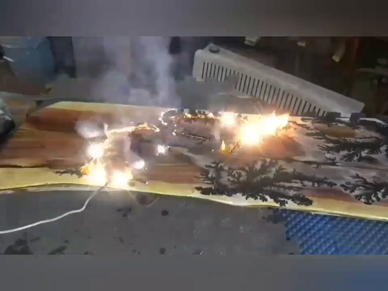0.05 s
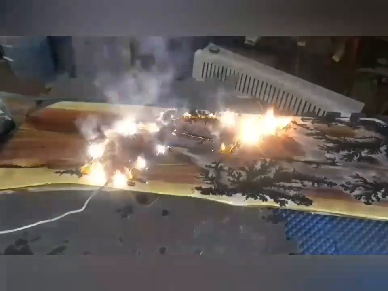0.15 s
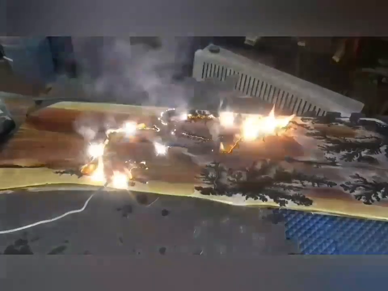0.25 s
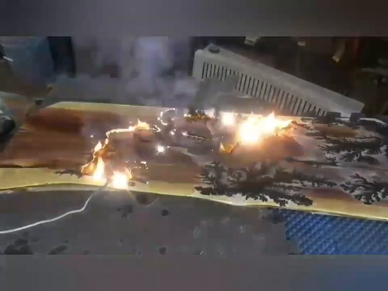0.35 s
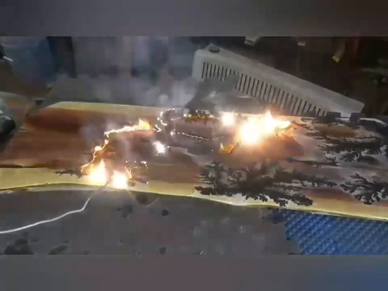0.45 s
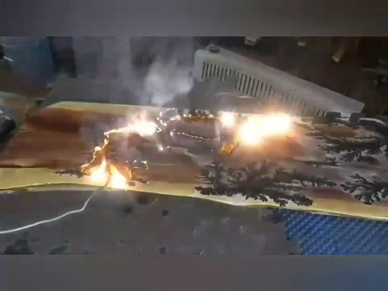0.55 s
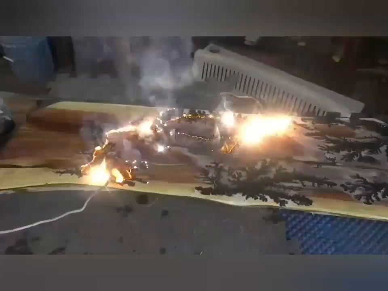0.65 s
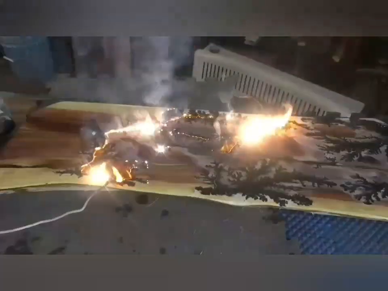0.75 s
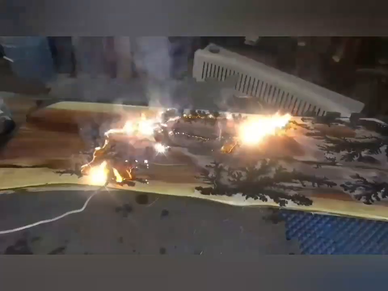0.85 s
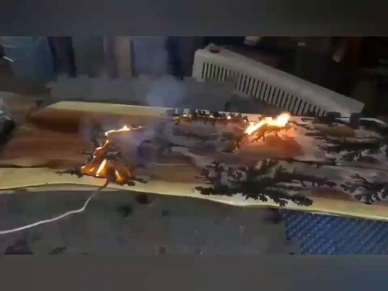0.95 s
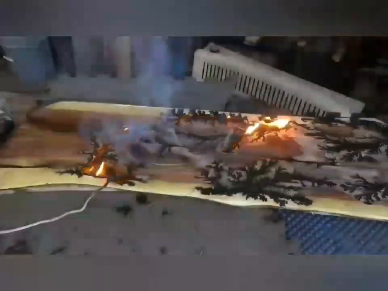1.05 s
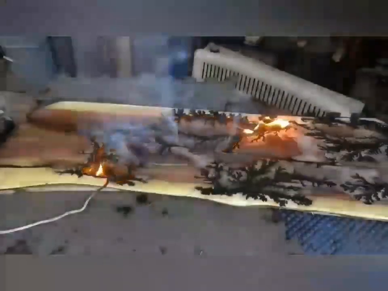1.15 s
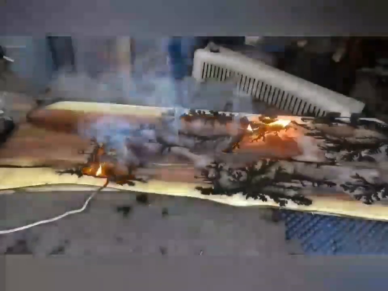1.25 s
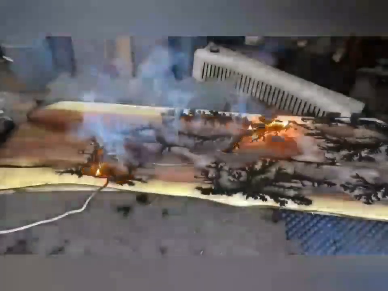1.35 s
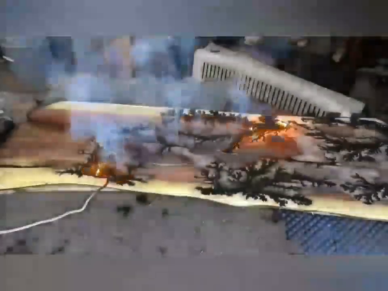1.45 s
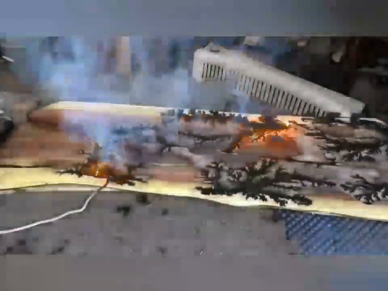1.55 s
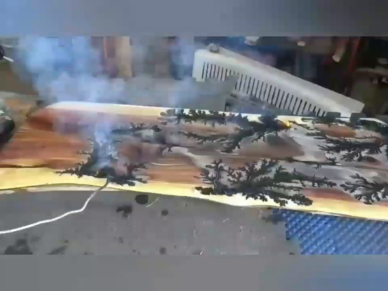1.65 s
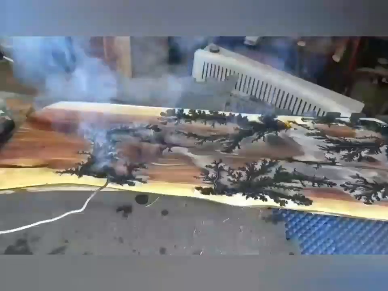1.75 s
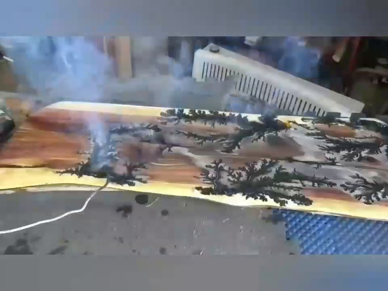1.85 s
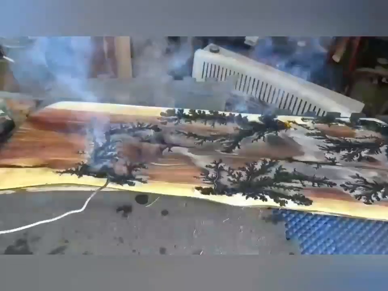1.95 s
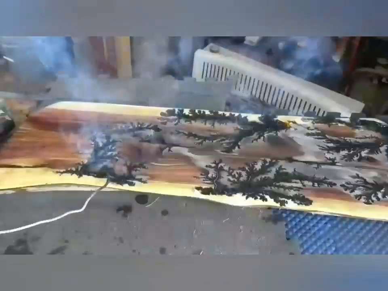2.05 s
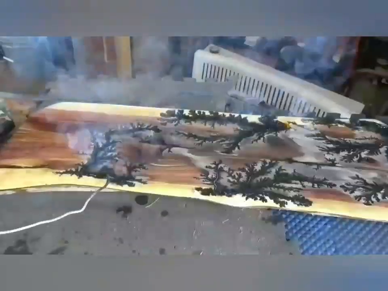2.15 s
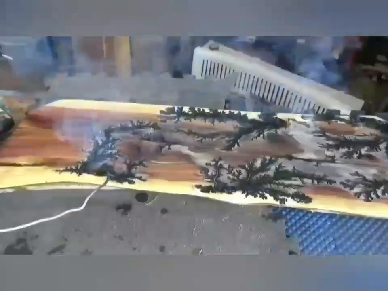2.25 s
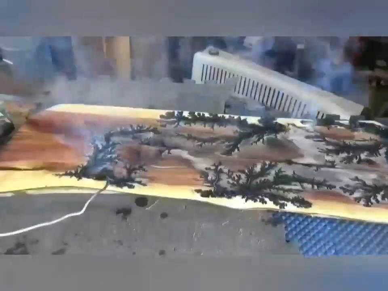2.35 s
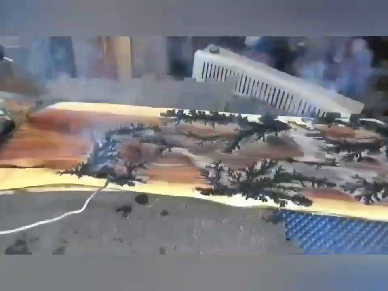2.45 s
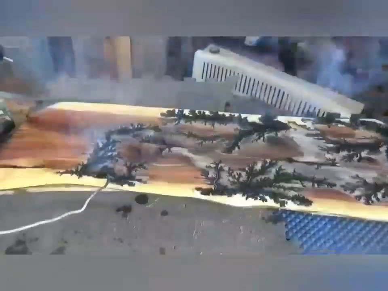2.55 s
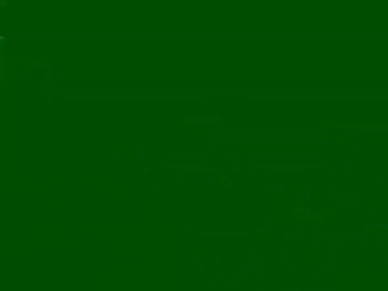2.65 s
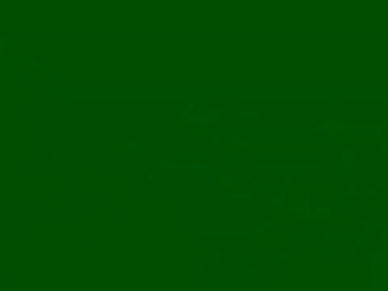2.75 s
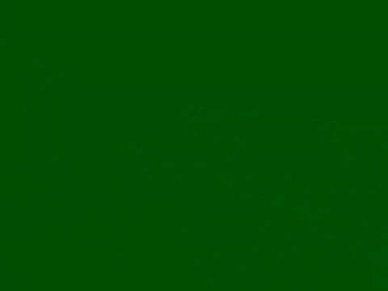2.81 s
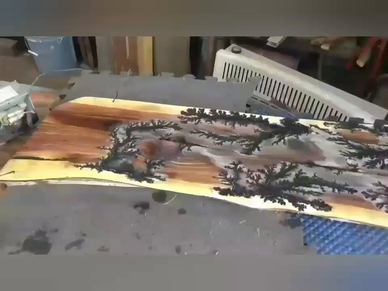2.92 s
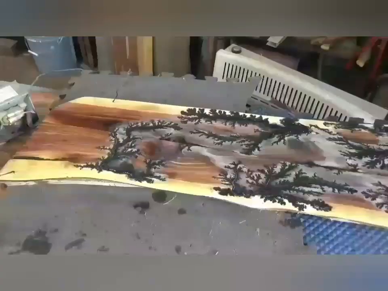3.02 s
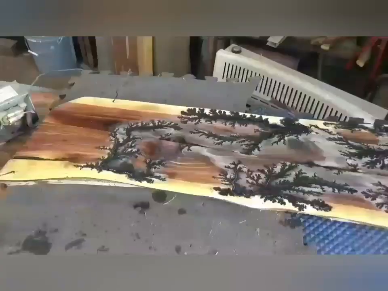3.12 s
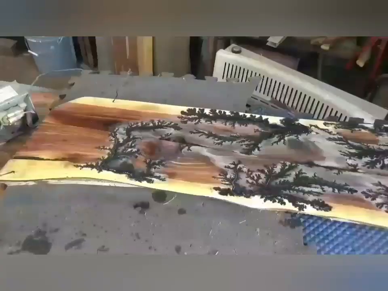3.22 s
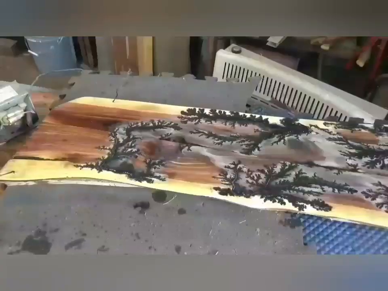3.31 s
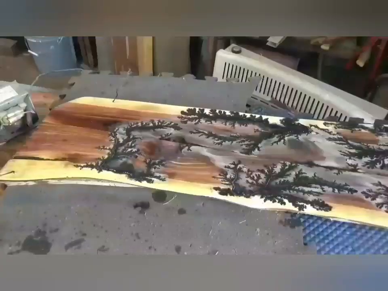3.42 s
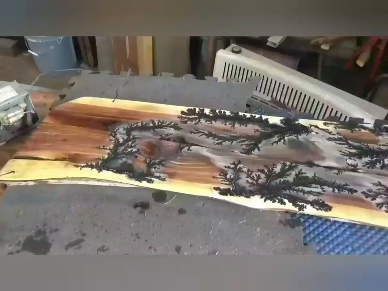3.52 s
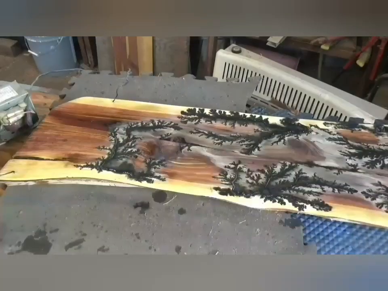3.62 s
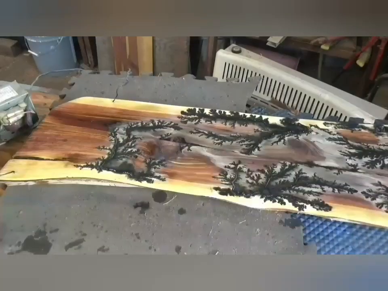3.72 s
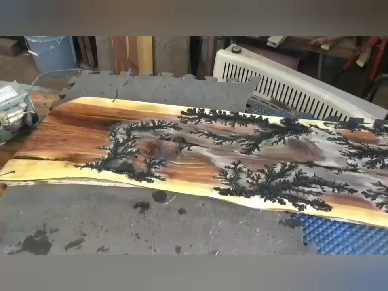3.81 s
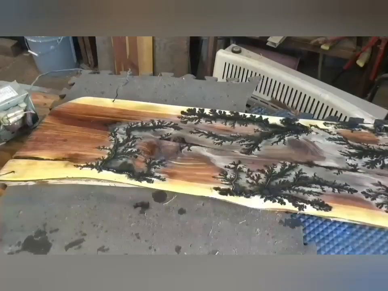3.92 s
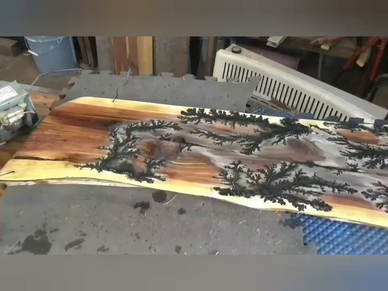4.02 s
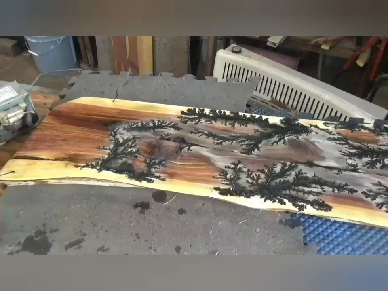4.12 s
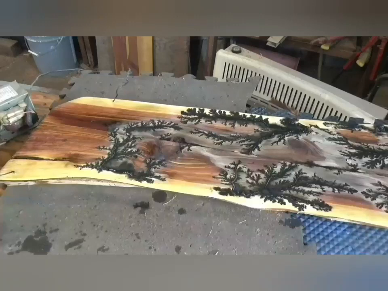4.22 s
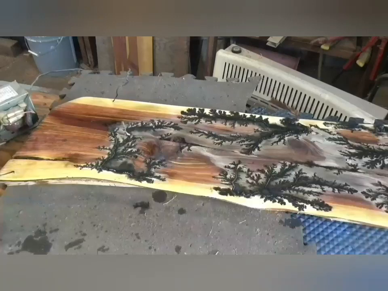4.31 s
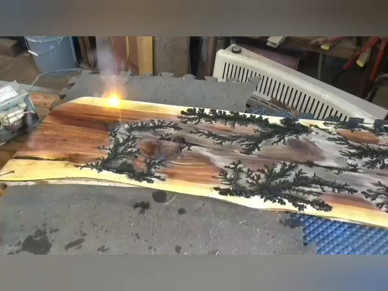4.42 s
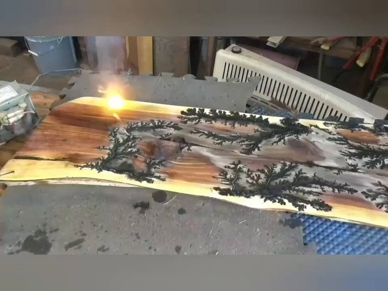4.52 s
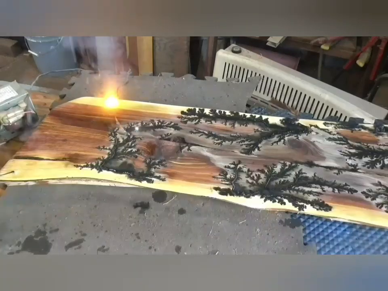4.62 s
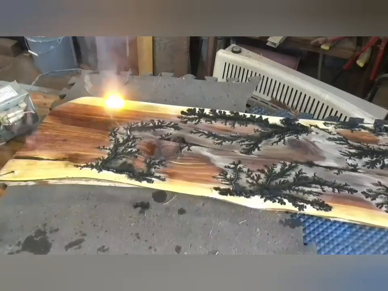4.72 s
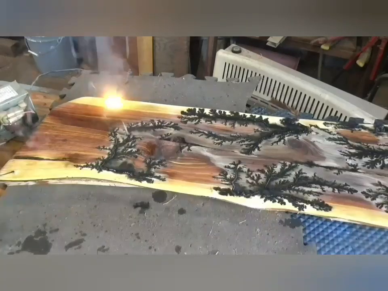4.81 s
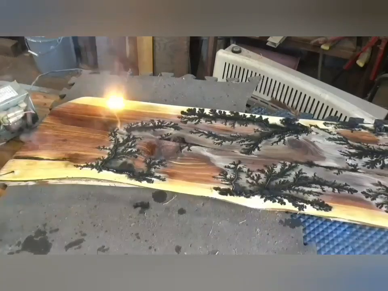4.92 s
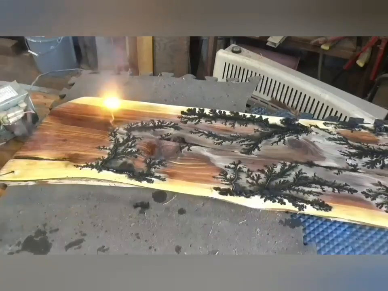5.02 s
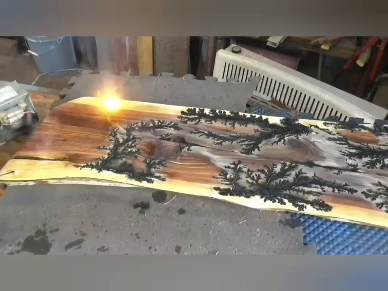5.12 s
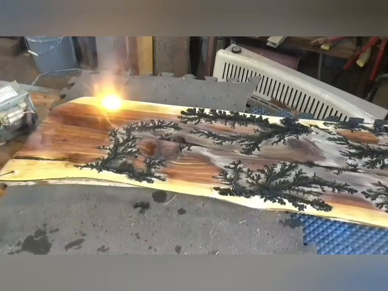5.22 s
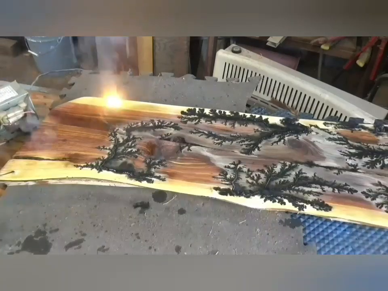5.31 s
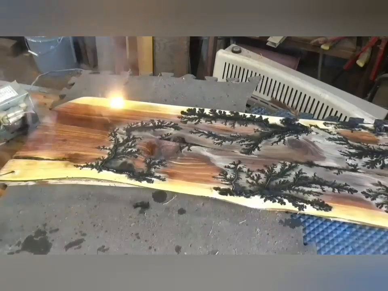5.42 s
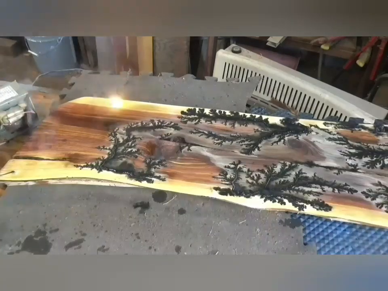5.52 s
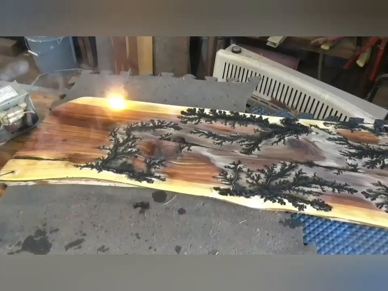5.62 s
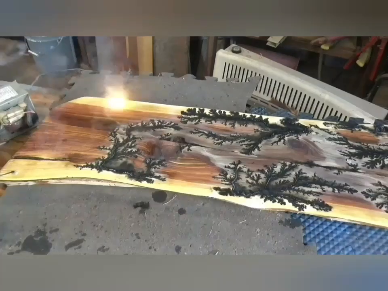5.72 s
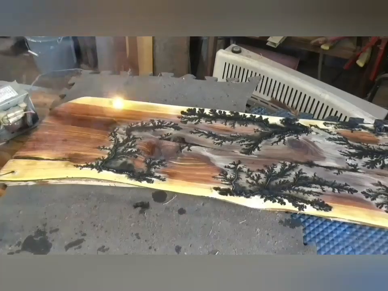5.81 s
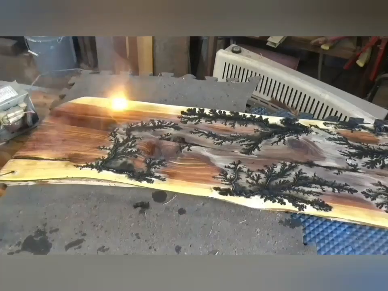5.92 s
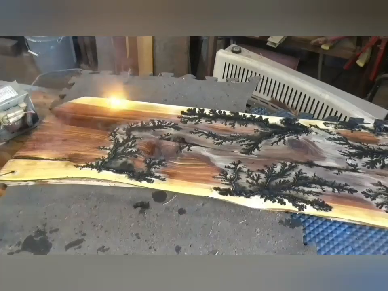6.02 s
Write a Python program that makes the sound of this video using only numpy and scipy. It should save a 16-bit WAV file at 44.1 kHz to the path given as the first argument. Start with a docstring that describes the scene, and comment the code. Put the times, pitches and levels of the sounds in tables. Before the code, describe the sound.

Electric arcs sizzle and hum on damp wood, cut out with a clack, leaving spitting steam, before a loud, rasping, snapping arc strikes.

```python
"""In a workshop, mains-frequency high voltage burns branching tracks into a damp wooden slab.
Small arcs sizzle over a hum: mains-pulsed noise and crackle above even harmonics and a sputtering flame.
The power drops with a clack of ringing modes; hot char fizzes, steams and spits in shaped bursts of noise.
Softer, the switch clacks again, and one fierce arc strikes: noise flashed sixty times a second over a
roaring, buzzing flame, with hard snaps. It blows out briefly, relights and burns on."""
import sys
import numpy as np
from scipy import signal
from scipy.fft import rfft, irfft, next_fast_len
from scipy.io import wavfile
from scipy.ndimage import map_coordinates

SR = 44100
rng = np.random.default_rng(int(sys.argv[2]) if len(sys.argv) > 2 else 0)


def output_pcm(signal):
    """Save a mono or channel-first signal as 16-bit PCM at the path in sys.argv[1].

    Samples are clipped to [-1, 1] before scaling.
    """
    pcm = np.clip(np.atleast_2d(signal).T, -1, 1) * 32767
    wavfile.write(sys.argv[1], SR, np.round(pcm).astype(np.int16))


N = 267246
T = np.arange(N) / SR
MAINS_HZ = 60
POWER_OFF_S = 0.948
TOP_HZ = 16100  # band limit of the output

# Spectrum of the workshop background [f/Hz, relative level/dB per Hz]
AIR_COLOUR = [(15, -39), (25, 7), (166, 12), (560, -8), (677, -28), (1190, -20), (1330, 4), (1610, -26),
              (16000, -9)]
# Room decay time [f/Hz, t60/s]
ROOM_DECAY = [(150, 0.071), (1500, 0.15), (12000, 0.34)]

# Spectrum of the small arcs' sizzle [f/Hz, relative level/dB per Hz]
SIZZLE_COLOUR = [(250, -20), (480, -5), (750, -5), (1050, -9.5), (1800, -7), (2500, -2), (3900, -3),
                 (4500, -7.5), (5400, -5), (6300, 0), (8000, -1.5), (10300, 0), (13000, -6), (16000, -6.5)]
# Stereo width of the sizzle [f/Hz, side minus mid level/dB]
SIZZLE_WIDTH = [(400, -31), (600, -8), (1300, -5.5), (2400, -10), (3400, -40), (4600, -1.5), (8000, -14.5),
                (15000, -8)]
# Harmonics of the hum [multiple of the mains, relative level/dB]
HUM_HARMONICS = [(2, 0.5), (4, -4.5), (6, -8), (8, -13), (10, -21.5), (12, -24)]
# Flames flare up along the tracks, or sink [t/s, hum gain/dB]
FLARES = [(0.032, 0.5), (0.078, 2.5), (0.16, 4.5), (0.245, 2), (0.334, 11), (0.4, 9.5), (0.51, -2),
          (0.63, 5), (0.718, 6.5), (0.78, -5), (0.82, 4), (0.89, 7.5), (0.936, 8.5)]
# Spectrum of the small flames [f/Hz, relative level/dB per Hz]
SPUTTER_COLOUR = [(25, -20), (80, 7), (330, 5.0), (520, -1.5), (750, -9), (1300, -44)]
# Stereo width of the small flames [f/Hz, side minus mid level/dB]
SPUTTER_WIDTH = [(60, -4), (150, -9), (220, -20), (400, -18), (550, -6)]
# Spectrum of the hot gas puffs [f/Hz, relative level/dB per Hz]
DRAUGHT_COLOUR = [(15, -12), (35, -2), (80, 0), (160, -12), (400, -50)]
# Stereo width of the hot gas puffs [f/Hz, side minus mid level/dB]
DRAUGHT_WIDTH = [(30, -1), (150, -5)]

# The switch clacks as the power drops and, softly, as it returns [t/s, blow level/dB]
CLACKS = [(0.946, -25.5), (4.124, -44)]
# Resonances of the switch [f/Hz, width/Hz, relative level/dB]
CLACK_MODES = [(625, 42, 0), (745, 60, -4), (872, 50, 0), (960, 70, -6), (1470, 70, -7), (2520, 300, -17)]
# The char cracks with a bright tick [t/s, blow level/dB]
TICK = (2.184, -41)
# Resonances of the tick [f/Hz, width/Hz, relative level/dB]
TICK_MODES = [(3400, 81, -5), (3650, 160, 0), (4580, 90, -4)]
# One dull knock [t/s, blow level/dB]
KNOCK = (2.312, -44)
# Resonances of the knock [f/Hz, width/Hz, relative level/dB]
KNOCK_MODES = [(172, 30, 0), (262, 40, -11), (900, 900, -25)]

# Stages of the steam between the arcs
# [start t/s, end t/s, hiss level/dB, body level/dB, level change/dB per s]
HISSES = [(0.944, 2.58, -56.5, -55.5, -8), (2.7, 4.04, -56.5, -56, -0.7), (4.134, 4.385, -48.5, -51, 16)]
# Spectrum of the seeping steam [f/Hz, relative level/dB per Hz]
STEAM_COLOUR = [(88, -4.5), (150, -5.5), (514, -8.5), (624, -7.5), (1040, -11.5), (1720, -8), (3700, -7.5),
                (4860, -9.5), (8560, -9.5), (14800, -16.5), (16000, -17)]
# Stereo width of steam and background [f/Hz, side minus mid level/dB]
STEAM_WIDTH = [(60, -27), (150, -26), (380, -8), (950, -3), (2380, -5.5), (5980, -3), (15000, -10)]
# Spectrum of the finest bubbles [f/Hz, relative level/dB per Hz]
FIZZ_COLOUR = [(2000, -38), (7000, 2), (13000, -2), (16000, -6)]
# Spits of steam [t/s, relative level/dB, body against treble/dB, rise/s, fall/s]
SPITS = [(1.206, -28.5, -7, 0.0097, 0.014), (1.25, -32.5, -8.5, .011, 0.031),
         (1.323, -28.5, -8.5, 0.02, 0.017), (1.417, -22, -5.5, 0.0065, 0.013),
         (1.487, -34, -5.5, 0.036, .03), (1.581, -44, -5, .01, .007), (1.72, -40.5, -11, 0.038, 0.031),
         (1.795, -34, -10, .009, .013), (1.903, -35, -10, .004, 0.018), (2.184, -35, -5.5, 0.0077, 0.013),
         (2.313, -54, 7, .002, .008), (2.42, -40.5, -1, 0.0066, 0.019), (2.468, -45.5, -4, 0.016, 0.022),
         (2.811, -35.5, -1.5, .024, 0.006), (2.892, -30, -1.5, .01, 0.022), (2.99, -42.5, -4, .04, 0.041),
         (3.225, -38.5, -0.5, 0.0022, 0.017), (3.3, -33, -5, 0.019, 0.012),
         (3.325, -33, -20, 0.0075, 0.0049), (3.5, -38, -2.5, 0.033, 0.069), (3.694, -27, -5.5, 0.014, .02),
         (3.816, -26, -1, .008, 0.015), (4.06, -42, 2, 0.0044, 0.013), (4.112, -30, -8, 0.0036, 0.0055),
         (4.157, -36.5, 2, 0.008, 0.007)]
# Spectrum of the spits [f/Hz, relative level/dB per Hz]
SPIT_COLOUR = [(59, -13.5), (100, -7.5), (280, -7.5), (583, -5), (1000, -8.5), (1650, -2.5), (3050, -4.5),
               (5190, -8.5), (11400, -10.5), (15000, -20), (16000, -30)]
# Two small cracks inside every spit [t after the spit's time/s]
SPIT_CRACKS = [.0015, 0.00675]

# The big arc strikes, blows out and relights [lit t/s, out t/s, rasp level/dB, flame level/dB]
BURNS = [(4.401, 5.559, -20, -27.5), (5.631, 5.663, -25.5, -31), (5.71, 6.06, -22, -26)]
# The big arc's flame surges and gutters [t/s, half length/s, flame gain/dB]
SURGES = [(4.439, 0.0069, 4.5), (4.555, 0.055, 4), (4.667, 0.016, 6.5), (4.733, 0.027, -5),
          (4.893, 0.04, 6), (5.188, 0.086, 6), (5.26, 0.02, -7), (5.328, 0.016, 3), (5.516, 0.12, 3),
          (5.727, 0.027, 4.5), (5.832, 0.011, 4.5), (6.007, 0.018, 7)]
# The hard flash changes to the other half cycle [t/s]
FLIPS = [5.175, 5.64, 5.865]
# Spectrum of the rasp [f/Hz, relative level/dB per Hz]
RASP_COLOUR = [(150, -25), (350, -4), (750, -2), (900, -3), (1300, -1.5), (1750, -2), (2050, 0), (3100, 0),
               (3600, -4.5), (5500, -5), (7000, -5.5), (11000, -7), (12800, -10.5), (16000, -11.5)]
# Spectrum of the flame's roar [f/Hz, relative level/dB per Hz]
ROAR_COLOUR = [(25, -16), (60, -11), (85, -4), (115, -1), (170, 0), (210, -4), (300, 0), (400, -1),
               (460, -3), (550, 0), (680, -1), (790, -3), (900, -9), (2500, -30)]
# Harmonics of the flame's buzz [multiple of the mains, relative level/dB]
BUZZ_HARMONICS = [(2, -3.5), (3, -9), (4, -5.5), (5, -5.5), (6, -1), (9, -1.5), (13, -5)]
# Stereo width of the big arc [f/Hz, side minus mid level/dB]
ARC_WIDTH = [(30, -2), (70, -6), (120, -14), (380, -13), (700, -8), (1100, -10), (1600, -8), (2800, -12),
             (4400, -5.5), (15000, -3)]
# The hardest re-ignitions [t/s, relative level/dB, relative treble level/dB]
SNAPS = [(4.394, -16, -9), (4.441, -12.5, -3), (4.474, -14, -15), (4.49, 1, -15), (4.66, -3, -8),
         (4.694, -2, -5.5), (4.809, -7, -4), (4.874, -5.5, -9), (4.943, -0.5, -17), (4.957, -1, -10),
         (5.043, -2, -7.5), (5.076, -1, -21), (5.09, -6.5, -19), (5.141, -4, -16), (5.158, -3.5, -7),
         (5.182, -2.5, -6), (5.232, -1.5, -8), (5.267, -3.5, -10), (5.317, -4, -10), (5.335, -2, -16),
         (5.417, -1.5, -21), (5.484, -1, -11.5), (5.556, -11, -29), (5.62, -7.5, -14), (5.645, -4, -23),
         (5.741, -3, -16), (5.76, -2, -17), (5.792, -5, -32), (5.811, -2, -29), (5.824, -7, -30),
         (5.84, -5.5, -25), (5.952, -4.5, -26), (5.968, -1.5, -18), (6.002, -4.5, -19), (6.019, -1.5, -14)]
# Spectrum of the snaps' tearing noise [f/Hz, relative level/dB per Hz]
SNAP_COLOUR = [(120, -9.5), (400, -3), (1200, -1), (2700, 4.5), (4000, -3.5), (10000, 3.5), (16000, -13)]

# Small arcs: levels at the start, fading as the wood dries
SIZZLE_DB, HUM_DB, DRYING_DB_PER_S = -29.5, -39.5, 5.5
FLARE_S, FLARE_SIZZLE = 0.021, 0.34  # half length; share of a flare's dB that the sizzle follows
# The arcs' echo off the slab: central delay (s), gain, wander of the delay (log scale)
SLAB_ECHO_S, SLAB_ECHO, ARC_WANDER = .0009, .45, .35
# Switch: time between chattering contacts and loss at each; a light touch of the lever ahead
BOUNCE_S, BOUNCE_LOSS_DB = 0.0084, 3.8
LEAD_S, LEAD_DB = 0.011, -4
# Hot char: fizz level and cooling time; hold of every spit
FIZZ_DB, FIZZ_FALL_S = -55.5, 0.83
SPIT_HOLD_S = 0.0089
# Big arc: rise and fall of a burn; share of a surge's dB that the rasp follows
LIGHT_S, QUENCH_S, SURGE_RASP = 0.012, 0.02, 0.31
FLASH_DELAY = 0.665  # when in the cycle the gap breaks down (mains cycles)
# Extra delay as the arc stretches before it first blows out (mains cycles, s)
STRETCH_DELAY, STRETCH_S = 0.33, 0.094
SNAP_HEAT_DB, SNAP_HEAT_S = 2.5, 0.016  # swell of the rasp around a 0 dB snap: gain, half length
SNAP_DELAY_S, SNAP_HOLD_S, SNAP_FALL_S = .0015, 0.00098, .0014


def amp(db):
    """Decibels to gain."""
    return 10 ** (np.asarray(db) / 20)


def unit(x):
    """Scale to rms 1."""
    return x / np.sqrt(np.mean(x ** 2) + 1e-20)


def along(points, hz):
    """Read (Hz, value) points on a log axis."""
    f, v = np.transpose(points)
    return np.interp(np.log(hz + 1), np.log(f + 1), v)


def wobble(rate):
    """A smooth random curve, rate knots a second."""
    knots = rng.standard_normal(int(N * rate / SR) + 4)
    return map_coordinates(knots, [T * rate], order=2)


def bump(s, half):
    """A bell of height 1 around time s."""
    return np.exp(-((T - s) / half) ** 2)


def swell(start, end, rise, fall):
    """1 from start to end, with exponential flanks outside."""
    before = np.minimum(T - start, 0) / rise
    after = np.maximum(T - end, 0) / fall
    return np.exp(np.maximum(before - after, -40))


def filtered(x, response):
    """Shape x by a response of frequency."""
    m = next_fast_len(N + SR // 4)
    return irfft(rfft(x, m) * response(np.fft.rfftfreq(m, 1 / SR)), m)[..., :N]


def white():
    """Two unrelated noises."""
    return rng.standard_normal((2, N))


def coloured(pair, spectrum, width):
    """Give two unrelated signals a spectrum and mix them into left and right, rms 1."""
    def response(hz):
        return amp(along(spectrum, hz)) * np.array([np.ones_like(hz), amp(along(width, hz))])
    mid, side = filtered(pair, response)
    return unit(np.array([mid + side, mid - side]))


def split(x, edge_hz):
    """The parts below and above an edge, each of rms 1."""
    low = filtered(x, lambda hz: 1 / (1 + (hz / edge_hz) ** 4))
    return unit(low), unit(x - low)


def workshop(x):
    """A short room answer: a noise tail whose bass dies first and whose treble rings longest."""
    hz, t, z = signal.stft(rng.standard_normal((2, SR // 3)), SR, nperseg=256)
    decay = amp(-60 * t / along(ROOM_DECAY, hz)[:, None])
    tail = signal.istft(z * decay, SR, nperseg=256)[1]
    return signal.fftconvolve(x, tail / np.linalg.norm(tail[0]), axes=1)[:, :N]


def background():
    """Quiet workshop air as steady coloured noise."""
    return amp(-63.5) * coloured(white(), AIR_COLOUR, STEAM_WIDTH)


def flashes(order, delay, sharpness):
    """A bump each time the mains voltage breaks down the gap, order times a cycle; delay in mains cycles."""
    return np.exp(sharpness * (np.cos(2 * np.pi * order * (MAINS_HZ * T - delay)) - 1))


def crackle(rate, spread_db, smear):
    """Tiny discharges of uneven size, rate a second, each a noise burst dying in smear seconds; rms 1."""
    spread = amp(spread_db * np.clip(rng.standard_normal(N), -2, 2))
    size = (rng.random(N) < rate / SR) * spread
    power = signal.lfilter([1], [1, -np.exp(-2 / (smear * SR))], size ** 2)
    return unit(np.sqrt(power) * white())


def patchy(x, depth_db, span_hz, life):
    """Jets open and close: patches of the spectrum, from span_hz wide, swell and sink over life seconds."""
    z = signal.stft(x, nperseg=512)[2]
    rows, cols = np.indices(z.shape[1:])
    hz, s = rows * SR / 512, cols * 256 / SR
    band = 10 * np.log1p(hz / (10 * span_hz))  # patches widen toward the treble
    field = map_coordinates(rng.standard_normal((64, 512)), [band, s / life], order=2, mode="wrap")
    gain = amp(depth_db * field / (1 + hz / 12000))  # shallower in the treble
    return signal.istft(z * gain, nperseg=512)[1][:, :N]


def off_slab(x, rate):
    """Add the slab's echo; its delay shifts as the arc wanders, rate times a second, and sweeps the colour."""
    late = np.arange(N) - SR * SLAB_ECHO_S * np.exp(ARC_WANDER * wobble(rate))
    return x + SLAB_ECHO * np.array([map_coordinates(side, [late]) for side in x])


def squeaks(centre_hz, life, glide, count):
    """Boiling sap whistles through pores in short gliding chirps; rms 1 while the power is on."""
    out = np.zeros((2, N))
    t = np.arange(SR // 10) / SR - .05
    times = rng.uniform(0, POWER_OFF_S, count)
    traits = np.clip(rng.standard_normal((count, 4)), -1.7, 1.7)
    for s, (pitch, size, bend, pan) in zip(times, traits):
        hz = centre_hz * 2 ** (.9 * pitch) * np.exp(glide * bend * t)
        chirp = amp(2 * size) * np.exp(-(t / life) ** 2) * np.sin(2 * np.pi * np.cumsum(hz) / SR)
        out[:, int(s * SR):][:, :len(t)] += amp([[2 * pan], [-2 * pan]]) * chirp
    return unit(out) * np.sqrt(POWER_OFF_S * SR / N)


def mains_tone(orders, delay, waver_db, waver_phase, rate):
    """Stereo stack of mains harmonics; the restless flame shakes each one's size and phase."""
    def line(k, db):
        apart = 0.087 * np.array([wobble(rate), wobble(rate)])  # left and right drift a little apart
        sway = waver_phase * (wobble(rate) + apart)
        return amp(db + waver_db * wobble(rate)) * np.sin(2 * np.pi * k * (MAINS_HZ * T - delay) + sway)
    return unit(sum(line(k, db) for k, db in orders))


def draught():
    """Uneven puffs of hot gas, felt more than heard; rms 1."""
    puffs = white() * amp(4 * wobble(9))
    return coloured(puffs, DRAUGHT_COLOUR, DRAUGHT_WIDTH)


def small_arcs():
    """The tracks sizzle on both half cycles; the heated air hums in even harmonics and flames sputter."""
    flare_db = sum(db * bump(s, FLARE_S) for s, db in FLARES)
    dried_db = DRYING_DB_PER_S * T
    sizzle_level = amp(SIZZLE_DB - dried_db + FLARE_SIZZLE * flare_db)
    hum_level = amp(HUM_DB - dried_db + flare_db)

    pulse = unit(0.78 + 0.62 * flashes(order=2, delay=0.35, sharpness=1.0) * amp(1.1 * wobble(114.0)))
    sparks = white() + .8 * crackle(rate=900, spread_db=4, smear=.001)
    sparks = patchy(sparks, depth_db=3.7, span_hz=520, life=.03)
    sizzle = coloured(pulse * off_slab(sparks, rate=14), SIZZLE_COLOUR, SIZZLE_WIDTH)
    sizzle = sizzle * amp(0.88 * wobble(36.3))
    sap = amp(-15.5) * squeaks(centre_hz=1510, life=0.006, glide=7, count=110)
    high = sizzle_level * (sizzle + sap) * swell(0, POWER_OFF_S, .005, 0.018)

    hum = -mains_tone(HUM_HARMONICS, delay=.078, waver_db=2.8, waver_phase=.3, rate=30)
    sputter = white() + .6 * crackle(rate=150, spread_db=3, smear=.003)
    sputter = patchy(sputter, depth_db=4.5, span_hz=200, life=.025)
    flame = coloured(sputter, SPUTTER_COLOUR, SPUTTER_WIDTH)
    low = hum_level * (hum + amp(-3.5) * flame + amp(-22) * draught())
    return high + low * swell(0, POWER_OFF_S, .01, 0.0098)


def struck(blows, modes, contact):
    """Short rough contacts ring a set of resonances; the ring keeps the energy of the blows."""
    def ring(f):
        total = 0
        for k, (centre, width, db) in enumerate(modes):
            resonance = 1j * f * width / (centre * centre - f * f + 1j * f * width)
            total = total + (-1) ** k * amp(db) * resonance
        return total
    push = sum(amp(db) * (T >= s) * swell(s, s, contact, contact) for s, db in blows)
    sound = filtered(push * rng.standard_normal(N), ring)
    return sound * np.sqrt(np.sum(push ** 2) / np.sum(sound ** 2))


def knocks():
    """The chattering switch, a bright tick and a dull knock, each a contact noise ringing its own modes."""
    touch = [(s - LEAD_S, db + LEAD_DB) for s, db in CLACKS]
    chatter = [(s + k * BOUNCE_S, db - k * BOUNCE_LOSS_DB) for s, db in CLACKS for k in range(7)]
    switch = struck(touch + chatter, CLACK_MODES, contact=.005)
    tick = struck([TICK], TICK_MODES, contact=.008)
    knock = struck([KNOCK], KNOCK_MODES, contact=.014)
    return switch + tick + knock


def seeping_steam():
    """Steam leaks from the burnt tracks: patchy noise whose body and hiss move in stages."""
    leak = white() + .4 * crackle(rate=500, spread_db=3, smear=.0005)
    leak = patchy(leak, depth_db=2.5, span_hz=260, life=.03)
    body, hiss = split(coloured(leak, STEAM_COLOUR, STEAM_WIDTH), edge_hz=1400)
    seep = np.zeros((2, N))
    for start, end, hiss_db, body_db, change_db in HISSES:
        drift = amp(change_db * (np.clip(T, start, end) - start))
        stage = amp(hiss_db) * hiss + amp(body_db) * body
        seep += stage * drift * swell(start, end, 0.038, 0.032)
    return seep


def spitting_steam():
    """Steam escapes in short gritty spits, each around two small cracks."""
    grit = white() + .7 * crackle(rate=900, spread_db=3, smear=.0006)
    grit = patchy(grit, depth_db=2.2, span_hz=200, life=.025)
    low, high = split(coloured(off_slab(grit, rate=6), SPIT_COLOUR, STEAM_WIDTH), edge_hz=800)
    spits = np.zeros((2, N))
    for s, db, low_db, rise, fall in SPITS:
        cracks = sum(swell(s + c, s + c, 0.00034, 0.00091) for c in SPIT_CRACKS)
        puff = swell(s, s + SPIT_HOLD_S, rise, fall) + 0.45 * cracks
        spits += amp(db - 11.0) * puff * (high + amp(low_db) * low)
    return spits


def hot_char():
    """Steam seeps and spits while the finest bubbles fizz on in the hot tracks, fading as they cool."""
    cooling = swell(POWER_OFF_S, POWER_OFF_S, .02, FIZZ_FALL_S)
    fizz = amp(FIZZ_DB) * coloured(white(), FIZZ_COLOUR, STEAM_WIDTH) * cooling
    return (seeping_steam() + fizz) * amp(1.96 * wobble(23.9)) + spitting_steam()


def flash_delay():
    """Where in the mains cycle the hard flash falls: later as the arc stretches, half a cycle on at each flip."""
    blowout = BURNS[0][1]
    stretch = (T < blowout) * np.exp(-np.abs(T - blowout) / STRETCH_S)
    return FLASH_DELAY + STRETCH_DELAY * stretch + .5 * np.searchsorted(FLIPS, T)


def snaps():
    """The gap breaks down: one pressure spike inside a few milliseconds of tearing noise, bright or dull."""
    body, treble = split(coloured(white(), SNAP_COLOUR, ARC_WIDTH), edge_hz=4200)
    tears, spikes = np.zeros((2, N)), np.zeros(N)
    for s, db, treble_db in SNAPS:
        start = s + SNAP_DELAY_S
        shape = swell(start, start + SNAP_HOLD_S, 0.00065, SNAP_FALL_S)
        tears += amp(db - 13.0) * shape * (body + amp(treble_db + 9.5) * treble)
        spikes[int(start * SR)] = -amp(db + 5)
    # round each spike between 600 and 3500 Hz
    return tears + filtered(spikes, lambda hz: 1j * hz / (600 + 1j * hz) / (1 + 1j * hz / 3500))


def big_arc():
    """One hard flash per cycle and a weak one between, over a roaring, buzzing flame."""
    surge_db = sum(db * bump(s, half) for s, half, db in SURGES)
    heat_db = SNAP_HEAT_DB * sum(amp(db) * bump(s, SNAP_HEAT_S) for s, db, _ in SNAPS)
    rasp_level, flame_level = np.zeros(N), np.zeros(N)
    for lit, out, rasp_db, flame_db in BURNS:
        burn = swell(lit, out, LIGHT_S, QUENCH_S)
        rasp_level += amp(rasp_db) * burn
        flame_level += amp(flame_db) * burn

    delay = flash_delay()
    hard = flashes(order=1, delay=delay, sharpness=6.6) * amp(1.8 * wobble(60))
    weak = flashes(order=1, delay=delay + .5, sharpness=6) * amp(3 * wobble(60))
    drive = unit(0.88 + 0.95 * hard + 0.087 * weak) * rasp_level * amp(SURGE_RASP * surge_db + heat_db)
    sparks = white() + 0.59 * crackle(rate=700, spread_db=2.5, smear=0.00056)
    sparks = patchy(sparks, depth_db=2.0, span_hz=260, life=.018)
    sparks = patchy(sparks, depth_db=1.5, span_hz=700, life=.05)
    rasp = drive * coloured(off_slab(sparks, rate=11), RASP_COLOUR, ARC_WIDTH)

    # wood bursts in coarse pops inside the flame
    pops = .8 * white() + crackle(rate=260, spread_db=4, smear=.0015)
    roar = coloured(pops * (1 + .5 * hard) * amp(1.43 * wobble(45)), ROAR_COLOUR, ARC_WIDTH)
    buzz = mains_tone(BUZZ_HARMONICS, delay=0.761, waver_db=3.5, waver_phase=0.78, rate=14)
    flame = amp(-1) * roar + amp(-3.5) * buzz + amp(-29.5) * draught()
    return rasp + snaps() + flame_level * amp(surge_db) * flame


def scene():
    """Arcs, char and knocks in the room, over its quiet background."""
    direct = small_arcs() + knocks() + hot_char() + big_arc()
    return direct + amp(-10.5) * workshop(direct) + background()


def record(dry):
    """Clip at full scale, then remove everything above the band limit."""
    return filtered(np.clip(dry, -1, 1), lambda hz: hz < TOP_HZ)


dry = scene()
out = record(dry)
output_pcm(out)
```